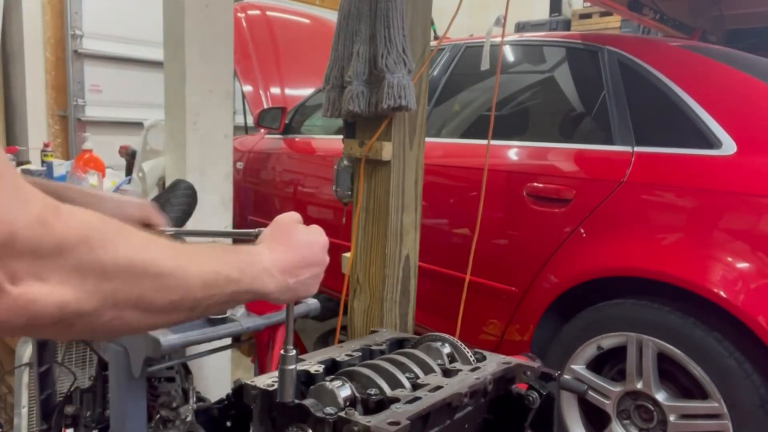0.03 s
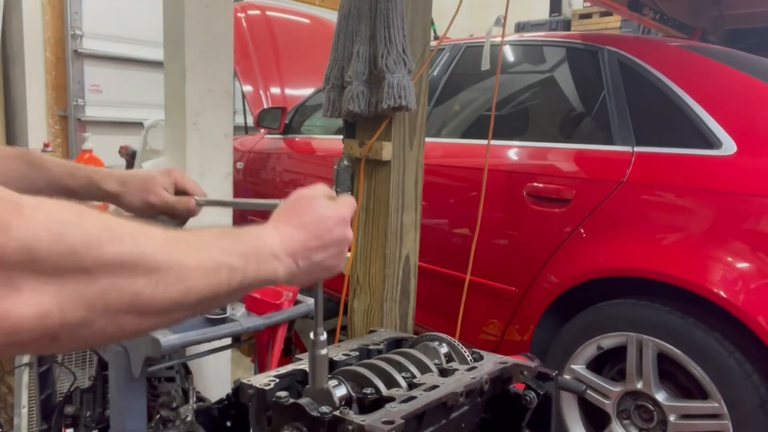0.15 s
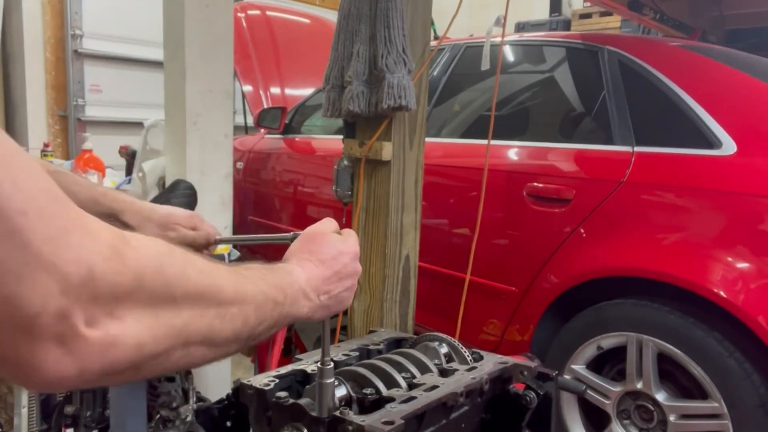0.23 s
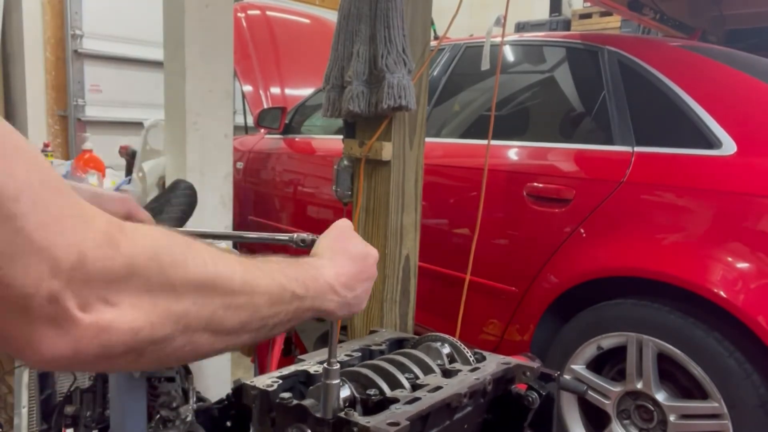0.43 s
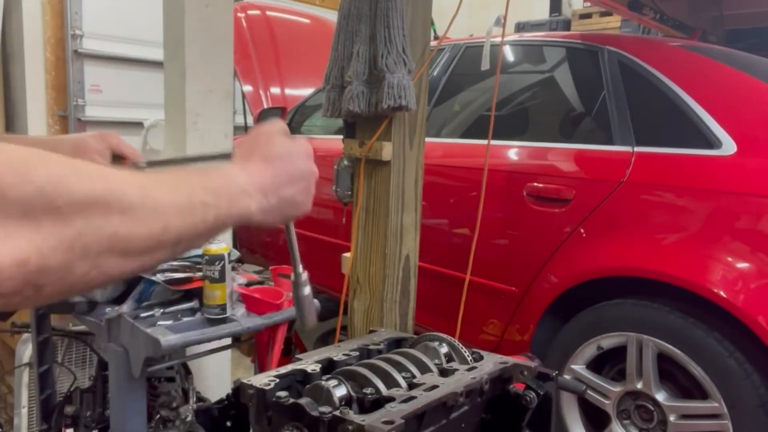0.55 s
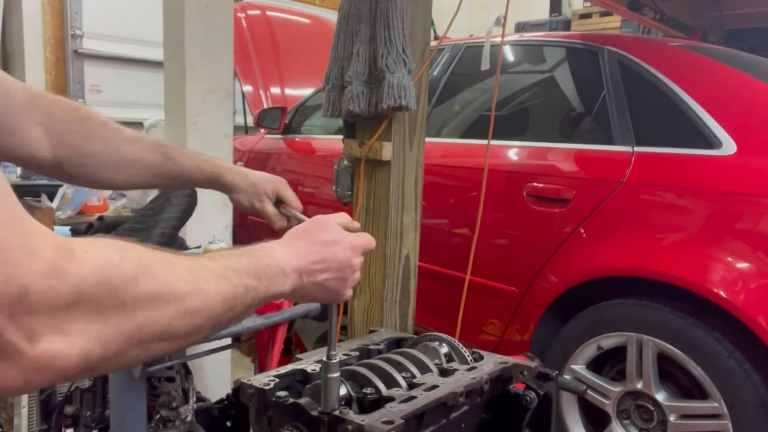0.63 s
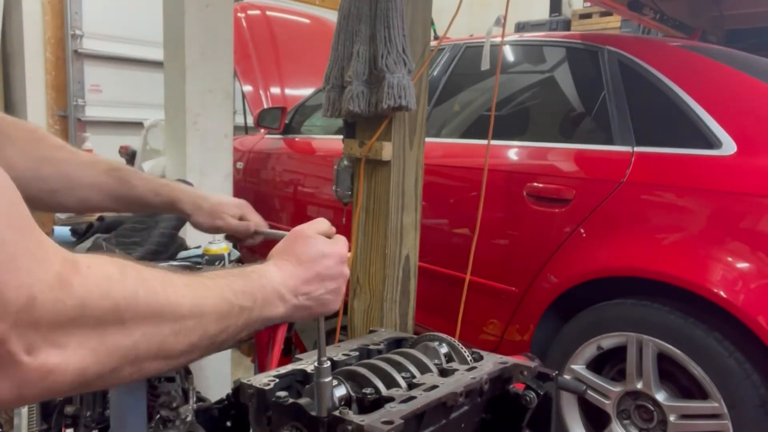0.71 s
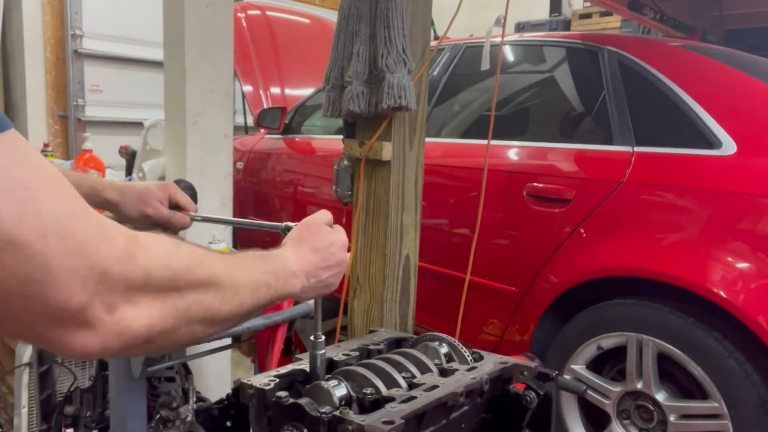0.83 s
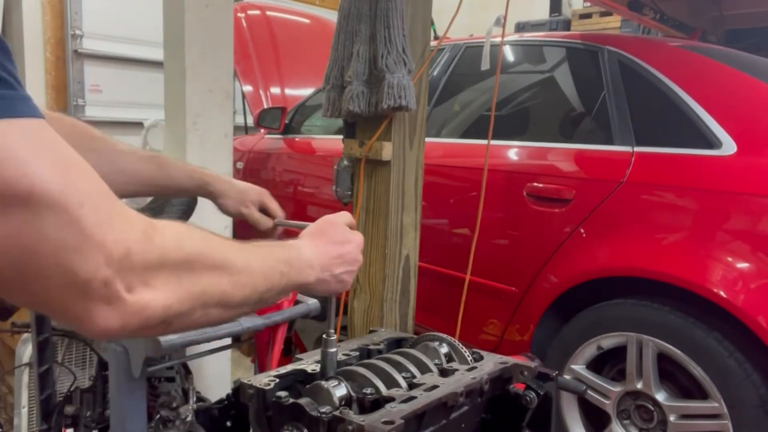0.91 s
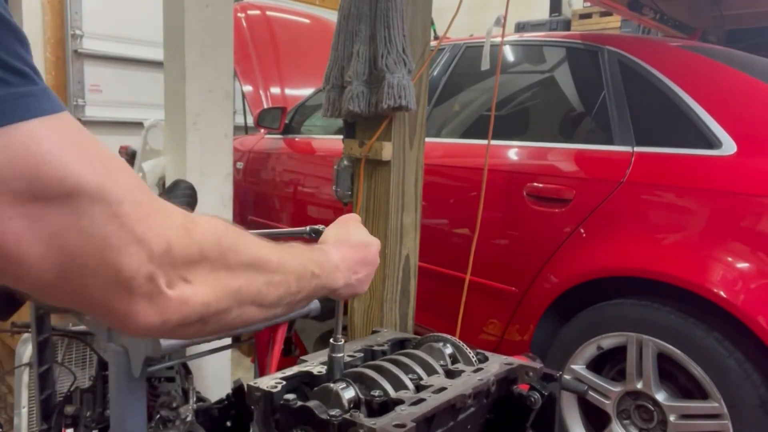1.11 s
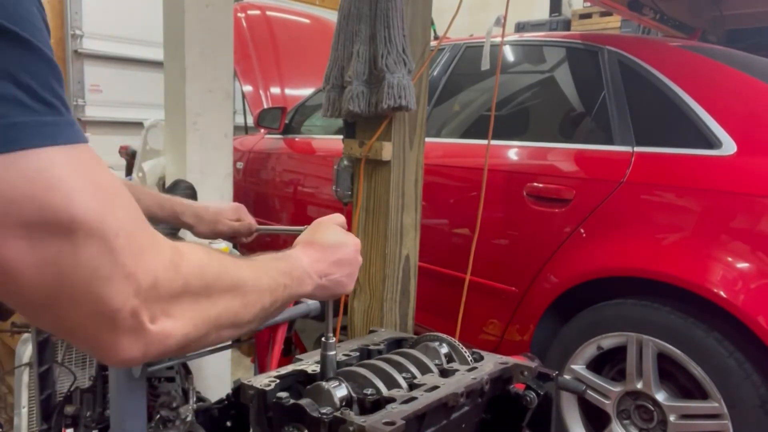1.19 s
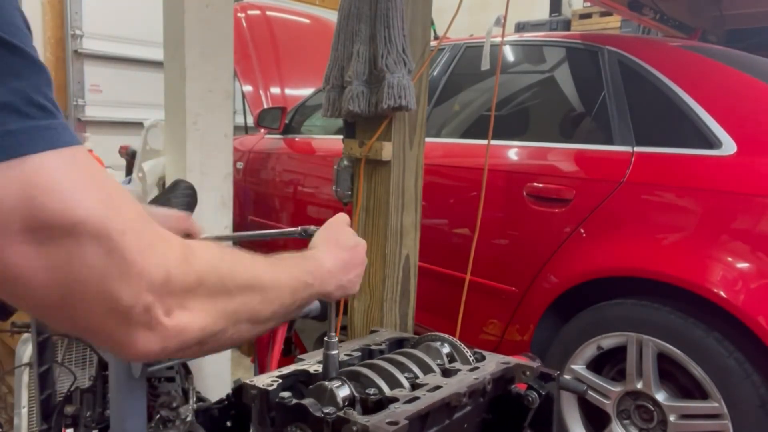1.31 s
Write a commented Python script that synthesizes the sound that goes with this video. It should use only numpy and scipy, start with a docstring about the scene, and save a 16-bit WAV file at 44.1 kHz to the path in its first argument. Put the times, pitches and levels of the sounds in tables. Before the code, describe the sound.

A ratchet and socket loosen a tight engine bolt with short, gritty steel squeaks and scrapes. Sharp ticks and faint dull knocks fall between them, then the ticking thins out. Heard close by in a quiet garage.

```python
"""Short, gritty steel squeaks and sharp ticks: a ratchet and socket work a tight bolt loose from an
engine block. The steel sticks and slips, each squeak sagging in pitch and breaking into scraping.
The tool's loose joints tick, its handle rustles and the block knocks dully as it takes the load.
A quiet garage answers softly, over faint air and a low rush."""
import sys
import numpy as np
from scipy import signal
from scipy.fft import rfft, irfft
from scipy.io import wavfile

SR = 44100
rng = np.random.default_rng(int(sys.argv[2]) if len(sys.argv) > 2 else 0)


def generate_wav(signal):
    """Clip the signal to [-1, 1] and save it as 16-bit WAV at the path in sys.argv[1]."""
    frames = np.transpose(np.atleast_2d(signal))
    scaled = np.clip(frames, -1, 1) * 32767
    pcm = np.round(scaled).astype(np.int16)
    wavfile.write(sys.argv[1], SR, pcm)


N = 59535
BIN_HZ = np.arange(N // 2 + 1) * SR / N


def amp(db):
    """Decibels to gain."""
    return 10 ** (np.asarray(db) / 20)


def unit(x):
    """Scale to rms 1."""
    return x / np.sqrt(np.mean(x ** 2))


def gain_at(f, points):
    """Gain of a (frequency [Hz], level [dB]) curve on a log-frequency axis."""
    hz, db = np.array(points).T
    return amp(np.interp(np.log(f + 1), np.log(hz), db))


def band(hz, width):
    """Gain per bin of a resonance of given relative width, with a bass cut."""
    f = BIN_HZ + 1
    resonance = 1 / np.sqrt(1 + ((f / hz - hz / f) / width) ** 2)
    return resonance / np.sqrt(1 + (0.23 * hz / f) ** 2) / np.sqrt(1 + (300 / f) ** 4)


def noise(colour, spread):
    """Coloured stereo noise, rms 1, wider in the treble."""
    mid, side = rfft(rng.standard_normal((2, N)))
    side = side * spread * np.clip(BIN_HZ / 3500, .35, 1)
    return unit(irfft(np.array([mid + side, mid - side]) * colour, N))


def wobble(hz):
    """Random fluctuation below hz, rms 1."""
    return unit(irfft(rfft(rng.standard_normal(N)) / (1 + (BIN_HZ / hz) ** 4), N))


def swell(age, rise_s, decay_s):
    """Smooth growth up to age 0, then exponential decay."""
    return np.exp(-np.maximum(-age / rise_s, 0) ** 4.5 - np.maximum(age / decay_s, 0))


def strike(age, rise_s, decay_s):
    """Linear attack, exponential decay."""
    return np.clip(age / rise_s, 0, 1) * np.exp(-np.maximum(age - rise_s, 0) / decay_s)


# Rush envelope: (time [s], level [dB])
RUSH_LEVEL = [(0, -71), (.13, -67), (.42, -71.5), (.62, -66), (.8, -82), (1.0, -80), (1.14, -86.5),
              (1.22, -70.5), (1.35, -74)]
# Rush and air spectra: (frequency [Hz], relative level [dB])
RUSH_SPECTRUM = [(100, -51), (200, -17.5), (320, -13.5), (450, 3), (900, 4.5), (1500, -1), (3000, -12),
                 (8000, -25)]
AIR_SPECTRUM = [(35, -54.5), (60, -20), (198, -27.5), (256, -22), (636, 2), (732, -16), (803, -2),
                (1010, -8), (2140, -4), (2580, -11), (16000, -23)]


def background(t, air_db=-79):
    """Faint steady air and a low rush that comes and goes."""
    rush_db = np.interp(t, *np.array(RUSH_LEVEL).T)
    rush = amp(rush_db) * noise(gain_at(BIN_HZ, RUSH_SPECTRUM), spread=.9)
    return rush + amp(air_db) * noise(gain_at(BIN_HZ, AIR_SPECTRUM), spread=.8)


# Reverb bands: (centre [Hz], level [dB], t60 [s])
TAIL_BANDS = [(400, -27, .4), (1492, -38, .33), (4000, -44, .3), (8000, -41, 0.49), (14000, -46.5, .2)]
# Echoes off nearby surfaces: (left delay [s], right delay [s], level [dB])
REFLECTIONS = [(.0042, 0.0022, -19.5), (.0093, 0.0052, -16.5), (0.0144, 0.02, -25), (0.0238, 0.0126, -34)]


def garage(x, t, early_db=-18, early_gap_s=.0027):
    """Adds quick reflections from block and car, then a short soft tail."""
    early = rng.standard_normal((2, N)) * strike(t - early_gap_s, .001, .0085)
    response = amp(early_db) * unit(early) / np.sqrt(N)
    diffuse = rfft(rng.standard_normal((2, N)))
    log_centres = np.log([row[0] for row in TAIL_BANDS])
    for selector, (hz, db, t60_s) in zip(np.eye(len(TAIL_BANDS)), TAIL_BANDS):
        crossfade = np.interp(np.log(BIN_HZ + 1), log_centres, selector)
        env = strike(t - .008, .008, t60_s / np.log(1000))
        response += amp(db) * unit(env) / np.sqrt(N) * irfft(diffuse * crossfade, N)
    for left_s, right_s, db in REFLECTIONS:
        response[[0, 1], [int(left_s * SR), int(right_s * SR)]] += amp(db)
    return x + signal.fftconvolve(x, response, axes=1)[:, :N]


# Knocks of the block on its stand: (time [s], level [dB], centre [Hz])
KNOCKS = [(0.202, -52.5, 660), (0.245, -55, 1020), (0.3, -49, 1004), (.307, -54.5, 341), (.320, -65.5, 897),
          (0.537, -51, 597), (.547, -45, 520), (.585, -56.5, 1090), (.690, -53.5, 507), (.699, -57, 495),
          (.884, -59.5, 1090), (.968, -70, 494)]
# Block modes: (frequency [Hz], relative level [dB], decay [s])
BLOCK_MODES = [(260.8, -2.5, .016), (416.4, 1, 0.006), (498, -15.5, .012), (629, -10, 0.01404),
               (814.3, -3.5, 0.0129), (887.3, -3.5, .01), (1250, -4, 0.021)]


def block_knocks(t, thud_db=-8, bass_cut_hz=470):
    """The block takes up the load with a thud and a few damped modes."""
    out = 0
    for start_s, db, centre_hz in KNOCKS:
        age = np.maximum(t - start_s, 0)
        colour = band(centre_hz, width=.71)
        ring = 0
        for k, (hz, mode_db, decay_s) in enumerate(BLOCK_MODES):
            gain = (-1) ** k * amp(mode_db) * np.interp(hz, BIN_HZ, colour)
            ring += gain * strike(age, .0022, decay_s) * np.sin(2 * np.pi * hz * age)
        thud = amp(thud_db) * noise(colour, spread=.4) * strike(age, .008, .009)
        out += amp(db) * (ring + thud)
    return signal.sosfilt(signal.butter(2, bass_cut_hz, "high", fs=SR, output="sos"), out)


# Modes of socket, extension and handle: (frequency [Hz], width [Hz], level [dB])
TOOL_MODES = [(1877, 25, -13.5), (2835, 30, -6), (3240, 26, -15.5), (3532, 56, -6), (3742, 46, -3),
              (4500, 14, -8), (4745, 35, -6.5), (5392, 220, -4.5), (5550, 150, -6.5), (6380, 24, 3),
              (7320, 51, -0.5), (9000, 49, 4), (9870, 130, 3.5), (10500, 40, -5.5), (11720, 40, -10.5),
              (13670, 70, 2), (13380, 360, -0.5)]


def tool_resonance(x, low_cut_hz=330):
    """Whatever the tool does sets its steel ringing; the slim parts radiate little bass."""
    f = np.arange(N + 1) * SR / (2 * N) + 1
    modes = sum(amp(db) / (1 + 1j * (f * f - hz * hz) / (f * width_hz))
                for hz, width_hz, db in TOOL_MODES)
    radiation = f / (f - 1j * low_cut_hz)
    return irfft(rfft(x, 2 * N) * (1 + modes) * radiation)[:, :N]


# Socket scrapes: (peak time [s], rise [s], decay [s], level [dB], centre [Hz], width [ratio])
SOCKET_SCRAPES = [(0.136, 0.031, 0.0065, -58, 3300, 1.05), (0.184, 0.017, 0.012, -68.5, 5000, 2.1),
                  (0.237, 0.0066, 0.014, -54.5, 4500, 0.86), (0.272, 0.024, 0.015, -43.5, 8500, 1.1),
                  (0.332, 0.014, 0.002, -39, 2600, 3.3), (0.351, 0.0058, 0.0036, -71.5, 6000, 1.1),
                  (0.386, 0.028, 0.0035, -67, 5500, 1.2), (0.498, 0.0057, 0.0059, -32, 7000, 0.93),
                  (0.513, 0.0027, .014, -40, 4000, 5.4), (0.5764, 0.0049, 0.003, -30.5, 5400, 0.15),
                  (0.581, 0.013, 0.0087, -40.5, 5000, 3.3), (.63, 0.024, 0.05, -63, 5700, 0.19),
                  (0.822, 0.0095, 0.0033, -67, 8100, 1.05), (.888, 0.0024, 0.011, -51, 2400, 3.6)]
# Handle slides: (peak time [s], rise [s], decay [s], level [dB])
HANDLE_SLIDES = [(.003, 0.0032, 0.0029, -51), (0.072, 0.015, 0.01, -59), (0.141, 0.0095, 0.0024, -59),
                 (0.748, 0.00324, 0.00195, -60), (.821, .006, .006, -61), (.859, 0.0027, .004, -42),
                 (1.0, 0.0063, 0.01, -61.5), (1.093, 0.01, 0.0031, -78.5), (1.177, 0.0065, .01, -59),
                 (1.346, 0.004, .012, -59.5)]


def scrapes(t, grain_db=2.5, socket_top_hz=13200, spread=.63):
    """Steel rubs on steel in dense grains: the socket scrapes, the sliding handle rustles."""
    grains = unit(amp(grain_db * wobble(hz=1100)))
    rolloff = 1 / np.sqrt(1 + (BIN_HZ / socket_top_hz) ** 10)
    socket = sum(amp(db) * swell(t - peak_s, rise_s, decay_s) * noise(band(hz, width) * rolloff, spread)
                 for peak_s, rise_s, decay_s, db, hz, width in SOCKET_SCRAPES)
    slide_env = sum(amp(db) * swell(t - peak_s, rise_s, decay_s)
                    for peak_s, rise_s, decay_s, db in HANDLE_SLIDES)
    handle = slide_env * noise(band(hz=14670, width=.52), spread)
    return grains * (socket + handle)


# Ticks of the tool's joints: (time [s], level [dB], ring [Hz], clack re ring [dB])
JOINT_TICKS = [(0.0511, -46.5, 2222, -12), (0.0615, -55.5, 13570, -0.5), (0.092, -52, 12200, -9),
               (0.1956, -43.5, 12800, -4.5), (0.2008, -32.5, 13740, -13), (0.203, -47, 3320, -15.5),
               (0.2978, -55, 13200, -7), (.3110, -42, 8820, 2.5), (.5350, -42, 11000, 3),
               (0.5406, -33, 12650, -8), (0.603, -35, 10640, -44), (0.662, -50, 13500, -24),
               (0.6644, -32, 13000, -19.5), (0.676, -52.5, 13100, -26), (0.6837, -46, 13500, -9),
               (0.688, -29.5, 11350, -15.5), (0.7226, -50, 13180, -11), (0.725, -44.5, 13240, -7.5),
               (0.934, -71, 13700, 0), (0.9429, -55.5, 13200, -9.5), (.9620, -35.5, 11820, -15),
               (0.993, -55.5, 14900, -8), (1.0147, -56.5, 14000, -10), (1.1608, -55.5, 13750, -10),
               (1.166, -52.5, 14000, -25), (1.171, -59, 14000, -15), (1.1948, -54.5, 13500, -6),
               (1.2054, -59, 14030, -8.5), (1.3316, -60, 13800, -1)]


def joint_ticks(t, rise_s=.0007, tail_db=-12.5, spread=.55):
    """Small steel parts snap together: a bright, quickly damped ring over a broad clack."""
    out = 0
    clack = noise(band(hz=5500, width=1), spread)
    for start_s, db, hz, clack_db in JOINT_TICKS:
        age = t - start_s
        ring = noise(band(hz, width=.21) ** 2, spread)
        env = strike(age, rise_s, .0017) + amp(tail_db) * strike(age, rise_s, .0042)
        out += amp(db) * env * (ring + amp(clack_db) * clack)
    return out


# Slips of the bolt: (time [s], length [s], pitch [Hz], hold [s], sag [Hz/s], level [dB], fade [dB/s],
# overtones [dB], brightening [dB/octave/s], attack [s], pitch overshoot [ratio], end droop [ratio],
# hiss [dB], shrill region [Hz])
SQUEAKS = [(0.2416, 0.027, 1635, .011, 6540, -31, 237.5, -1, 263, .0012, 0.13, 0.019, -17.5, 6500),
           (0.2858, .0100, 1808, 0.0028, 22000, -31.5, 104.5, -9, 58.5, 0.0016, 0.021, .05, -17, 8800),
           (0.317, .0122, 1827, 0.0029, 18680, -28, 182.5, -4, 244, 0.0025, .06, 0.0058, -15, 5400),
           (0.462, .0375, 1895, 0.014, 13900, -20.5, 371.5, -2.5, 63.5, .011, 1, 0.0067, -21.5, 3700),
           (0.506, 0.0052, 1523, 0.0013, 14200, -43.5, 201, 6, -2, .002, 0.0164, 0.046, -12.5, 8600),
           (0.857, .0240, 1828, 0.0027, 6500, -28, 36, -10.5, 57.5, 0.0059, 0.021, 0.05, -23, 8700),
           (0.8836, 0.004, 1474, 0.0011, 18400, -40.5, 178.5, -8.5, 0, .001, 0.022, 0.04, -22, 8700)]
# Spectra of the partials and the friction hiss: (frequency [Hz], relative level [dB])
PARTIAL_SPECTRUM = [(1200, 11), (1750, -2), (2600, 7), (3500, -0.5), (5300, -2.5), (6500, -3), (7600, -10),
                    (9000, -16.5), (10500, -23.5), (15000, -18.5)]
HISS_SPECTRUM = [(80, -44.5), (300, -18.5), (900, 1), (2500, 2.5), (6000, -6), (10000, -8), (15000, -5)]


def bolt_squeaks(t, release_s=.0022, bend_s=.003, shrill_db=4.5, shrill_octaves=.14, pan_db=1.1):
    """Stick-slip cycles slow down, and mostly brighten, as each slip runs out."""
    out = np.zeros((2, N))
    sides = np.array([[1], [-1]])
    hiss = noise(gain_at(BIN_HZ, HISS_SPECTRUM), spread=.63)
    jitter = 1 + .005 * wobble(hz=450)
    flutters = [amp(2.45 * min(k / 3, 1.5) * wobble(hz=267.3)) for k in range(1, 11)]
    for (start_s, length_s, hz, hold_s, sag_hz_per_s, db, fade_db_per_s, overtones_db,
         brightening, attack_s, overshoot, droop, hiss_db, shrill_hz) in SQUEAKS:
        age = np.clip(t - start_s, 0, length_s + release_s)
        sagging_hz = hz - sag_hz_per_s * np.maximum(age - hold_s, 0)
        start_bend = 1 + overshoot * np.exp(-(age / bend_s) ** 2)
        end_bend = 1 - droop * np.exp(np.minimum(age - length_s, 0) / bend_s)
        pitch_hz = sagging_hz * jitter * start_bend * end_bend
        phase = 2 * np.pi * np.cumsum(pitch_hz) / SR
        onset = np.clip(age / attack_s, 0, 1) ** 2
        release = np.clip((length_s + release_s / 2 - age) / (2 * release_s), 0, 1)
        env = amp(db - fade_db_per_s * age) * onset * release
        tilt_db_per_octave = brightening * (age - length_s / 2)
        for k, flutter in enumerate(flutters, 1):
            partial_hz = k * pitch_hz
            gain = gain_at(partial_hz, PARTIAL_SPECTRUM) * (partial_hz < SR * .45)
            gain *= flutter * amp(tilt_db_per_octave * np.log2(k))
            if k > 1:
                shrill = np.exp(-(np.log2(partial_hz / shrill_hz) / shrill_octaves) ** 2)
                gain *= amp(overtones_db + shrill_db * shrill) * onset  # overtones enter later
            stereo_phase = .33 * np.minimum(partial_hz / 3500, 1.5) * sides
            out += env * gain * np.sin(k * phase + stereo_phase)
        out += env * onset * hiss * amp(hiss_db)
    return out * amp(pan_db * sides / 2)


def scene():
    """The tool on the bolt, heard from close by in the garage."""
    t = np.arange(N) / SR
    tool = tool_resonance(bolt_squeaks(t) + joint_ticks(t) + scrapes(t))
    return garage(tool + block_knocks(t), t) + background(t)


def record(dry, top_hz=15900):
    """Steep low-pass on the top treble."""
    return signal.sosfilt(signal.ellip(8, .2, 70, top_hz, fs=SR, output="sos"), dry)


dry = scene()
out = record(dry)
generate_wav(out)
```